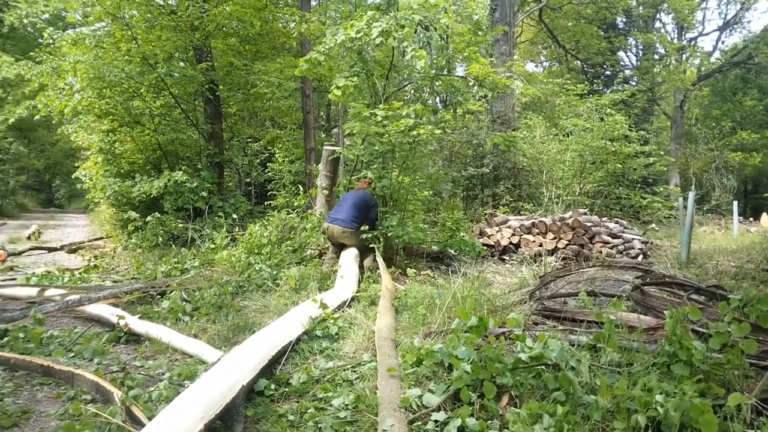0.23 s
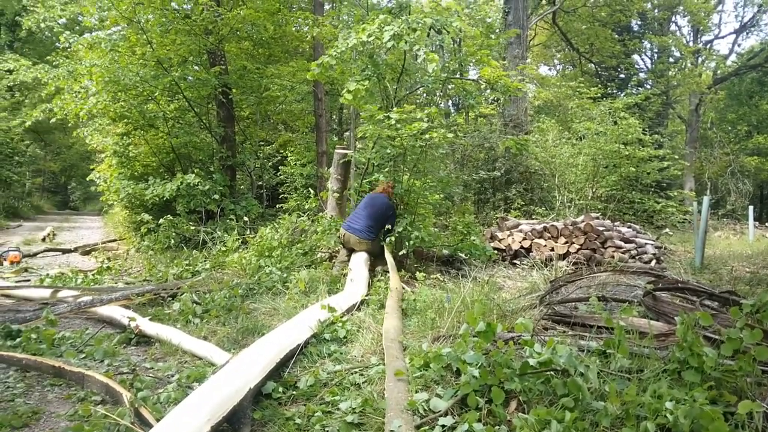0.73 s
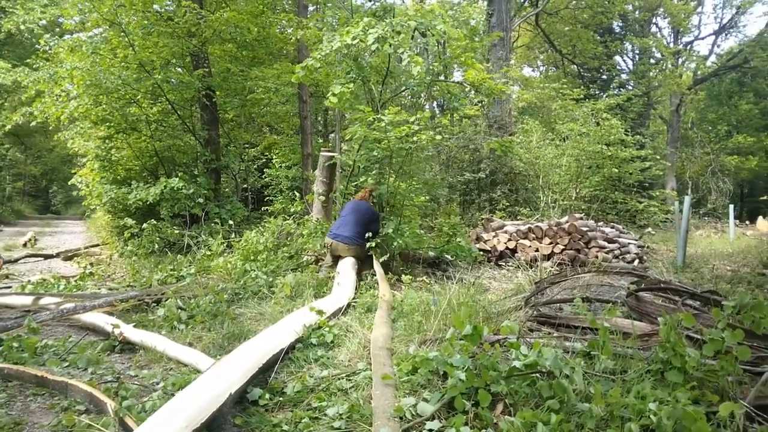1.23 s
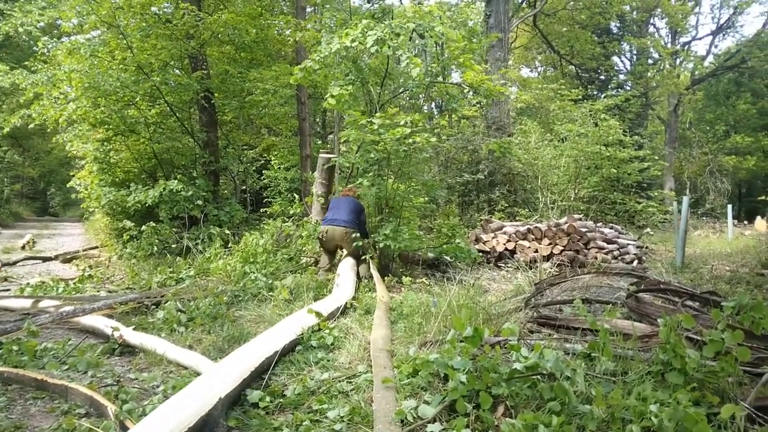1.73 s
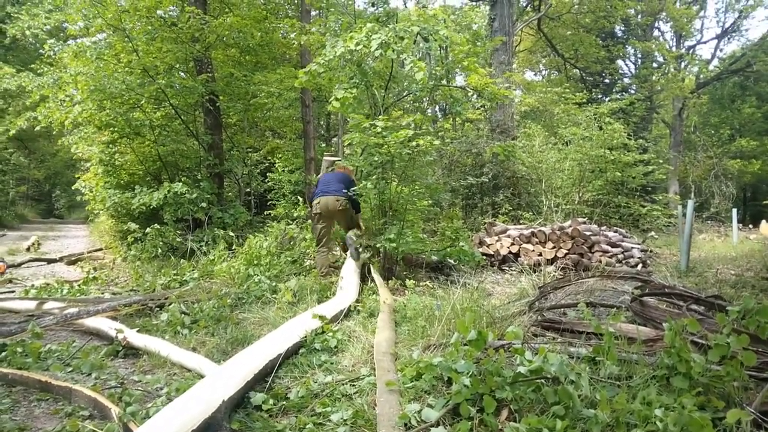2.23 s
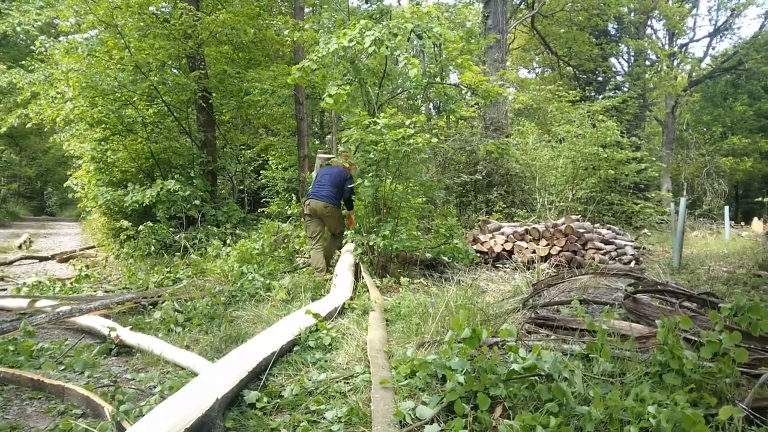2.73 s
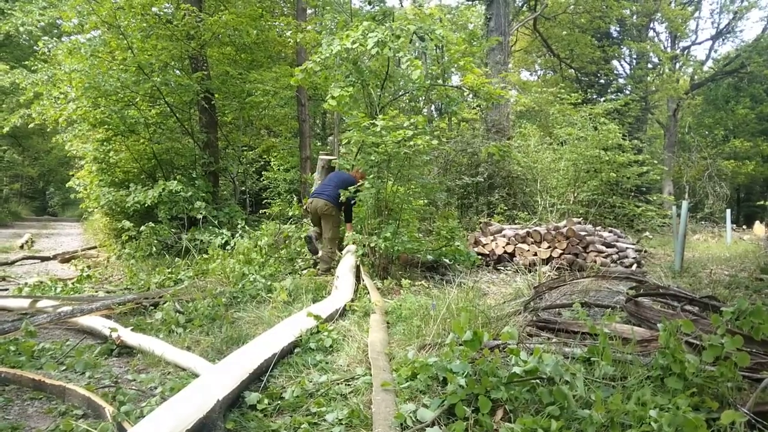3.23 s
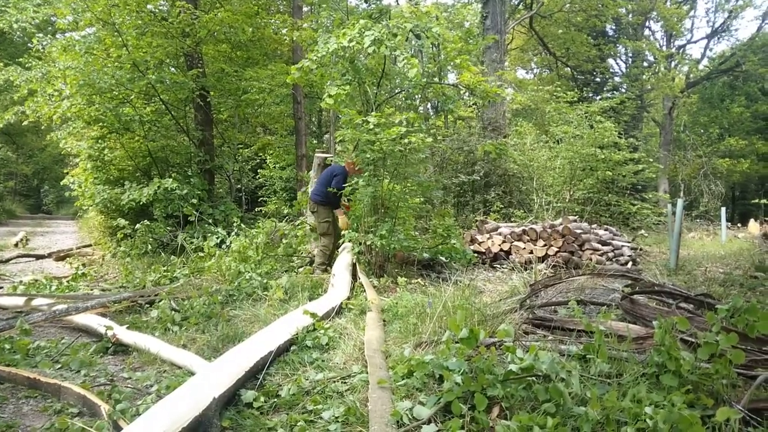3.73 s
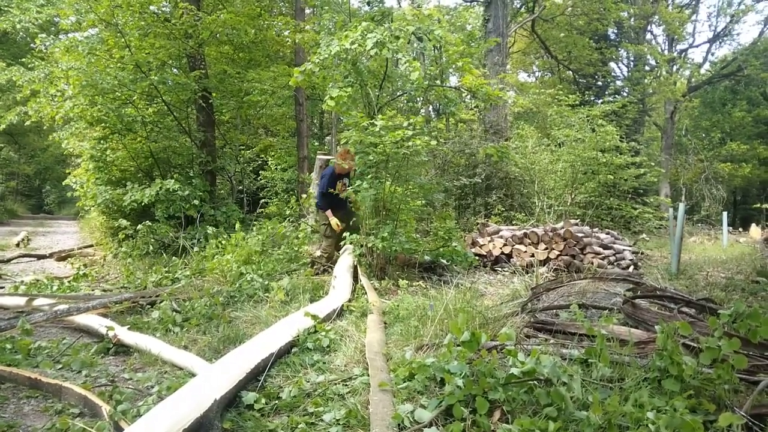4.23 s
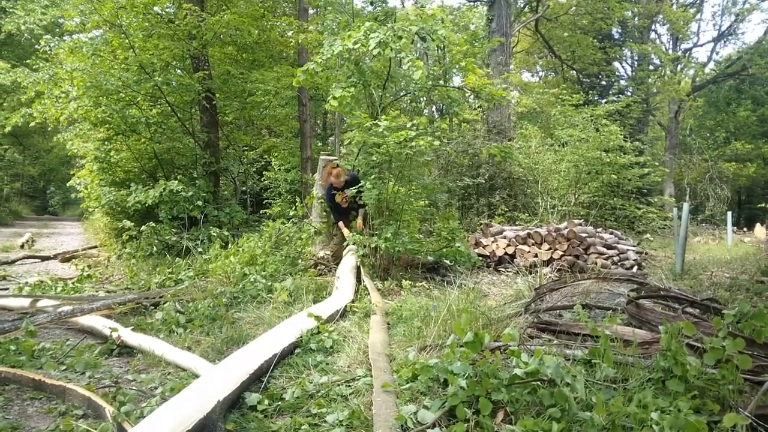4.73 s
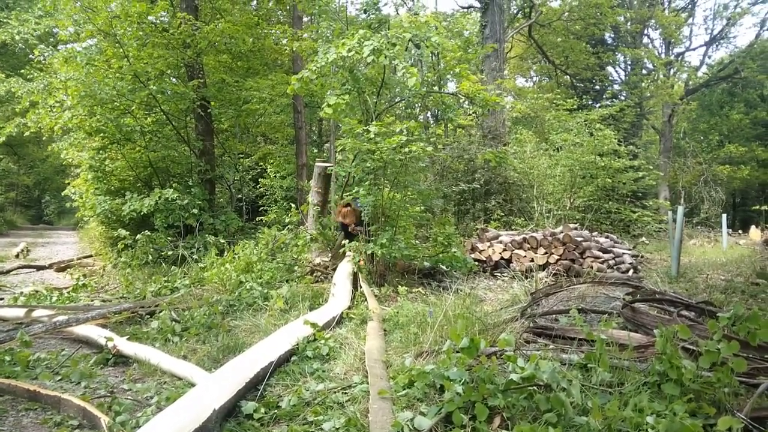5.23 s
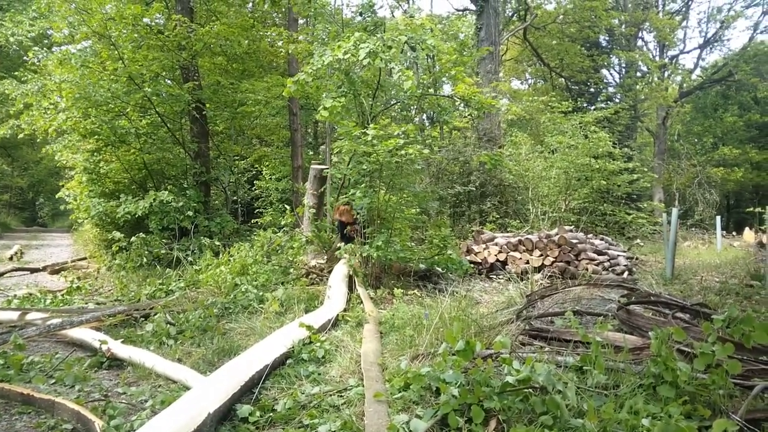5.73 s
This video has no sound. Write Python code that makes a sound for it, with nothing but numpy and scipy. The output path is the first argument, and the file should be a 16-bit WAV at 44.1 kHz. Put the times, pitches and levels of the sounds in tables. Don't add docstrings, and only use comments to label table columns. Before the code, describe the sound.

Bark is wrenched off a felled trunk in a quiet wood: fibres snap, one hard crack, dry peeling, litter rustle, faint birds, a final ripping strip.

```python
import sys
import numpy as np
from scipy import signal
from scipy.fft import rfft, irfft, next_fast_len
from scipy.io import wavfile
from scipy.ndimage import uniform_filter1d

SR = 44100
rng = np.random.default_rng(int(sys.argv[2]) if len(sys.argv) > 2 else 0)


def to_wav(sig):
    pcm = np.clip(np.atleast_2d(sig), -1, 1) * 32767
    pcm = np.round(pcm).astype(np.int16)
    wavfile.write(sys.argv[1], SR, pcm.T)


def how_loud(loudness_db):
    steps = np.asarray(loudness_db, float) / 20
    return 10 ** steps


N = 263277
TIME = np.arange(N) / SR
PADDED = next_fast_len(N + 4096, True)
HZ = np.arange(PADDED // 2 + 1) * SR / PADDED + 1e-3
OPPOSITE = np.array([[1], [-1]])

# [t/s, effort/dB, thickness of the bark that gives/dB]
PULLS = [
    [(0.505, -80, -5), (0.53, -69, -5), (0.542, -66, -12.5), (0.612, -41.5, 7), (0.65, -45, -2),
     (0.69, -54, -1), (0.75, -56, -0.5)],
    [(0.75, -58, -1), (0.82, -61, -5), (0.86, -60, -9.5), (1.034, -59, -14.5), (1.106, -64.5, -14),
     (1.186, -60, -15), (1.194, -47, -31), (1.204, -56, -15), (1.4, -55, -15.5)],
    [(1.4, -55, -16.5), (1.522, -44.5, -5.5), (1.538, -52.5, -7), (1.602, -46.5, -13.5), (1.7, -61.5, -5.5),
     (1.714, -63, -17.5), (1.854, -64, -1), (1.926, -65, -13.5), (1.935, -75, -10)],
    [(3.875, -71, -21), (3.93, -58, 6.5), (3.986, -59, -20.5), (4.146, -65, -10), (4.165, -75, -9)],
    [(4.772, -76, -19), (4.812, -61.5, -21), (4.95, -68.5, -17), (4.974, -68, -16), (4.985, -87.5, -10)],
    [(5.553, -80.5, 8), (5.558, -58, 3), (5.572, -69, -5), (5.594, -72, -12), (5.6, -82, -15),
     (5.62, -86, -15)],
    [(5.712, -93, 10), (5.739, -65, 4), (5.744, -41, -2.5), (5.758, -48, -1.5), (5.888, -36, -19),
     (5.908, -45, -5.5), (5.97, -46, -15)],
]


def level(x, db):
    return x * how_loud(db) / np.sqrt(np.mean(x ** 2))


def on_log(hz, table):
    f, v = np.transpose(table)
    return np.interp(np.log(hz + 1), np.log(f), v)


def shaped(x, gain):
    return irfft(rfft(x, PADDED) * gain, PADDED)[..., :N]


def bell(hz, width):
    return 1 / (1 + 1j * (HZ - hz ** 2 / HZ) / width) ** 2


def band(x, hz, width):
    return shaped(x, bell(hz, width))


def walk(rate):
    k = int(SR / rate)
    steps = np.repeat(rng.standard_normal(N // k + 1), k)
    return 1.3 * uniform_filter1d(uniform_filter1d(steps, k), k)[:N]


def patchy(x, table, centres_hz, walks_db):
    bands = np.clip(1 - np.abs(np.log2(HZ / centres_hz[:, None])), 0, 1)
    return how_loud(walks_db) * shaped(x, how_loud(on_log(HZ, table)) * bands)


def grains(rate, scatter_db):
    breaks = rng.random(N) < rate / SR
    size_db = scatter_db * np.minimum(rng.exponential(size=N), 3)
    return breaks * how_loud(size_db) * rng.standard_normal(N)


def rings(table, rise, spread, rough, splinter):
    out = np.zeros(N + 8192)
    chance = rng.random((len(table), 2))
    grit = rng.standard_normal((len(table), 2048))
    for (s, db, hz, cycles), (a, b), noise in zip(table, chance, grit):
        turn = np.arange(min(int(4 * max(cycles, .5) * SR / hz), 8000)) * hz / SR
        shape = (1 - np.exp(-turn / rise)) ** 2 * np.exp(-2 * turn / cycles)
        second_turn = turn * (1 + spread * (.5 + a)) + b
        ring = np.sin(2 * np.pi * turn) + rough * np.sin(2 * np.pi * second_turn)
        wide = 1 + int(SR / hz / 4)
        burst = uniform_filter1d(np.resize(noise, len(turn)), size=wide)
        ring += splinter * np.sqrt(wide) * uniform_filter1d(burst, size=wide)
        i = int(s * SR)
        out[i:i + len(turn)] += how_loud(db) * shape / shape.max() * ring
    return out[:N]


def handled(tables):
    effort_db, thick_db = np.full(N, -200.), np.zeros(N)
    for table in tables:
        s, db, thick = np.transpose(table)
        on = (TIME >= s[0]) & (TIME <= s[-1])
        effort_db[on] = np.interp(TIME[on], s, db)
        thick_db[on] = np.interp(TIME[on], s, thick)
    return effort_db, thick_db


def played(tables_db):
    return uniform_filter1d(how_loud(np.array(tables_db)), size=200, axis=-1)


def wood():
    # [f/Hz, level/dB per Hz]
    breeze = [(7.1, -27.5), (12, 6.5), (30, -13.5), (63, -15), (96, -20), (259, -29.5), (319, -30),
              (566, -35.5), (1360, -54.5), (2300, -62.5), (4000, -58.5), (11000, -67), (16000, -61)]
    centres_hz, swell = 14 * 2 ** np.arange(11), walk(1.5)
    walks_db = np.array([.5 * swell + (.9 + 1.18 * (hz > 1500)) * walk(5.8) for hz in centres_hz])
    mid, side = (patchy(rng.standard_normal(N), breeze, centres_hz, walks_db) for _ in range(2))
    unlike = on_log(centres_hz, [(20, .75), (60, .55), (200, .6), (1000, .75), (6000, .8)])[:, None]
    mid, side = (np.sum(p / np.sqrt(1 + unlike ** 2), axis=0) for p in (mid, unlike * side))
    return level(np.array([mid + side, mid - side]), -51)


def stirs():
    # [start t/s, peak t/s, end t/s]
    moments = [(0.078, 0.094, 0.104), (0.135, 0.152, 0.16), (0.338, 0.342, 0.346), (0.419, 0.422, 0.426),
               (0.445, 0.462, 0.478), (1.935, 1.98, 2.045), (2.05, 2.06, 2.11), (2.115, 2.17, 2.245),
               (2.25, 2.27, 2.312), (2.32, 2.42, 2.436), (2.438, 2.46, 2.541), (2.57, 2.62, 2.818),
               (2.832, 2.87, 2.927), (3.02, 3.04, 3.06), (3.295, 3.302, 3.314), (4.325, 4.335, 4.4),
               (4.61, 4.65, 4.668), (5.0, 5.045, 5.09), (5.11, 5.18, 5.228), (5.262, 5.268, 5.28),
               (5.29, 5.308, 5.322), (5.395, 5.42, 5.455), (5.655, 5.68, 5.7), (3.145, 3.152, 3.16),
               (3.715, 3.722, 3.735), (3.82, 3.845, 3.858)]
    # [peak level/dB, thickness/dB]
    strengths = [(-73, 4), (-81.5, 12.5), (-80, 1), (-80, -6), (-78.5, -4), (-67.5, -7), (-81, -9.5),
                 (-64, -6), (-76, -9), (-87, -8), (-67, -3.5), (-65.5, -12), (-64.5, -12), (-72.5, -29),
                 (-73, -4), (-81, -1.5), (-80, -8), (-67, -8.5), (-70, -8.5), (-86.5, 12), (-78.5, 1),
                 (-74, -5), (-87.5, 6.5), (-80.5, -14.5), (-89, -11), (-80, -1)]
    tail_s = 0.017
    return [[(start, db - 9, thick), (peak, db, thick), (end, db - 2.5, thick),
             (end + tail_s / 4, db - 13, thick), (end + tail_s, db - 21, thick)]
            for (start, peak, end), (db, thick) in zip(moments, strengths)]


def litter(gain):
    crunch = rng.standard_normal(N) + level(grains(250, 3.3), 0)
    dull = level(band(crunch, 450, 610), 0)
    loudest = how_loud(-59)
    return how_loud(-3.5 + 2.7 * walk(25)) * np.minimum(gain, loudest) * dull


def strip(gains, effort_db):
    # [f/Hz, width/Hz, level on the first strip/dB, level on the last/dB]
    resonances = [(3100, 600, -1, 3.5), (3600, 1100, 2, -2), (5600, 1400, -1.5, -3.5),
                  (7360, 3600, -9, -7.5), (2000, 700, -3.5, -23.5)]
    # [f/Hz, level/dB per Hz]
    leaf_hiss = [(880, -32), (1450, -4), (1860, 4.5), (2590, -1), (3690, 3), (4750, 0.5), (5340, 2),
                 (7450, -1), (8790, -5.5), (10100, -17.5), (13000, -25), (15500, -27.5)]
    last_strip_s = 5.0
    pull = np.clip((effort_db + 53) / 13, .08, .97)
    shared = level(grains(900, 4), 0)
    crackle = np.zeros(N)
    for hz, width, first_db, last_db in resonances:
        struck = level(grains(934, 4.1), 0) + 0.49 * shared + .5 * rng.standard_normal(N)
        crackle += how_loud(np.where(TIME < last_strip_s, first_db, last_db)) * band(struck, hz, width)
    rub = rng.standard_normal(N) + 0.44 * level(grains(1800, 1.5), 0) + 0.43 * level(grains(400, 2.2), 0)
    patches_db = [3 * walk(28) for _ in range(4)]
    hiss = patchy(rub, leaf_hiss, 1250 * 2 ** np.arange(4), patches_db).sum(axis=0)
    main = np.sqrt(pull) * level(crackle, 0) + np.sqrt(1 - pull) * level(hiss, 0)
    fibres = np.sqrt(pull) * shared + np.sqrt(1 - pull) * rng.standard_normal(N)
    woody = level(band(fibres, 1240, 1900), 0)
    wisp = 0.29 * np.abs(bell(14000, 4200))
    airy = level(shaped(rub, np.abs(bell(10000, 1600)) + wisp), 0)
    return sum(p * g * how_loud(1.6 * walk(40)) for p, g in zip((main, woody, airy), gains))


def rip():
    # [t/s, peak level/dB]
    low = [(5.7245, -58), (5.7422, -30), (5.746, -36), (5.75, -41), (5.7585, -33), (5.7625, -21.5),
           (5.77, -38), (5.773, -34), (5.78, -34), (5.786, -31), (5.8012, -37), (5.8057, -30),
           (5.8265, -29), (5.8295, -30), (5.8332, -36), (5.842, -33), (5.847, -19), (5.852, -46),
           (5.862, -26.5), (5.868, -31), (5.8728, -35), (5.877, -40), (5.8846, -33), (5.8956, -29.5),
           (5.9075, -36), (5.9258, -21.5), (5.9365, -45), (5.949, -42), (5.9595, -23.5), (5.963, -29.5)]
    # [t/s, peak level/dB]
    high = [(5.7253, -48.5), (5.731, -48), (5.746, -26.5), (5.75, -42), (5.752, -37), (5.758, -22.5),
            (5.7611, -17), (5.7619, -18.5), (5.764, -20.5), (5.7703, -25.5), (5.773, -26), (5.78, -31.5),
            (5.7852, -23), (5.7985, -33), (5.804, -24), (5.806, -30), (5.8118, -33), (5.8284, -24.5),
            (5.834, -30), (5.8431, -35), (5.848, -19), (5.8554, -29), (5.8595, -27), (5.8658, -30.5),
            (5.8674, -22), (5.875, -25), (5.878, -35), (5.8852, -27), (5.8951, -39), (5.907, -33),
            (5.9266, -27.5), (5.95, -45), (5.9596, -28), (5.963, -26.5)]
    cycles, scatter = 5, 0.085
    rows = [(s, db, 3100) for s, db in low] + [(s, db, 5600) for s, db in high]
    chance = rng.standard_normal(len(rows))
    return [(s, db, hz * (1 + scatter * c), cycles) for (s, db, hz), c in zip(rows, chance)]


def snapping():
    # [t/s, peak level/dB, ring f/Hz, decay/cycles]
    fibres = [(0.0819, -56, 2540, 1.5), (0.1511, -44, 6940, 1.6), (0.4575, -56.5, 3270, 4.2),
              (0.5337, -43, 3770, 9.9), (0.5721, -37, 3420, 7.1), (0.5843, -28, 4000, 2.5),
              (0.5996, -36.5, 3320, 4.8), (0.6037, -33.5, 3580, 4.4), (0.6057, -27.5, 3840, 4.6),
              (0.6098, -26, 3100, 6), (0.6125, -28.5, 3600, 4.5), (0.6172, -28.5, 3320, 4.8),
              (0.6205, -26, 3490, 5.8), (0.6231, -27.5, 3360, 3.6), (0.6273, -23.5, 3810, 4),
              (0.6333, -32.5, 3960, 4.8), (0.6414, -33, 3653, 4.3), (0.987, -52, 5300, 30),
              (1.0438, -43.5, 10000, 9), (1.4464, -37, 6550, 5.6), (1.563, -40, 3200, 4),
              (1.5178, -31, 9800, 4.3), (1.6755, -52, 1980, 3.7), (0.6447, -26, 4960, 4.3),
              (0.6563, -32.5, 4244, 4.2), (0.7145, -22, 3730, 2.8), (0.7147, -25, 5140, 3),
              (1.1941, -45, 2600, 2), (1.2114, -40, 3920, 1.7), (1.359, -48, 6030, 3.8),
              (1.461, -37, 4040, 17), (1.487, -38, 2970, 5.5), (1.4988, -61.5, 3600, 3.9),
              (1.5083, -39, 4070, 5), (1.5175, -33, 4100, 2.2), (1.525, -29, 3840, 3.3),
              (1.5715, -36.5, 3150, 4.2), (1.5938, -25, 3100, 2.8), (1.5941, -25, 5900, 4),
              (1.6615, -33, 4050, 6), (1.6625, -27.5, 7100, 2.6), (1.7325, -51, 6000, 6),
              (0.095, -49.5, 8100, 4.7), (3.302, -61, 3460, 1.65), (3.9245, -40.5, 3700, 6.9),
              (3.9582, -43, 5435, 5.5), (5.0479, -53.5, 5387, 4.6), (5.1494, -60, 2840, 6),
              (5.2667, -63.5, 3000, 4.9), (5.5565, -42, 3060, 5.3)]
    # [t/s, peak level/dB, ring f/Hz, decay/cycles]
    more_fibres = [(1.005, -54, 5200, 48), (1.1935, -37.5, 10300, 4.7), (1.4975, -36, 1990, 6),
                   (1.6635, -37.5, 3900, 6), (2.1635, -54.5, 2920, 6.8), (3.3025, -60.5, 2000, 3),
                   (4.8105, -57, 4320, 5), (4.335, -64, 3300, 3), (1.4445, -45, 2100, 5), (4.7893, -58, 6690, 5),
                   (4.8033, -58, 3570, 5), (5.1769, -58, 3100, 8), (1.3595, -46, 9300, 5), (1.4, -54, 3500, 3.7),
                   (1.335, -49, 2200, 4), (1.417, -48, 3000, 4), (4.005, -47, 7000, 4)]
    snaps = rings(fibres + more_fibres, rise=.45, spread=.25, rough=.35, splinter=.9)
    snaps = snaps + rings(rip(), rise=0.57, spread=0.85, rough=0.031, splinter=0.45)
    return shaped(snaps, 1 / (1 + (1900 / HZ) ** 6))


def cracking():
    # [t/s, peak level/dB, ring f/Hz, decay/cycles]
    bark = [(0.115, -62, 860, 6), (0.153, -44.5, 627, 0.98), (0.5958, -17, 1240, 1.4),
            (0.6062, -7.5, 1360, 1.55), (0.6097, -21, 950, 1.4), (0.5843, -48, 1410, 2),
            (0.6012, -28.5, 560, 0.94), (0.6119, -22.5, 1310, 1.2), (0.6125, -36, 570, 2.3),
            (0.6178, -23, 660, 1.6), (0.6208, -20.5, 1286, 1.5), (0.6253, -37, 1200, 2),
            (0.6322, -36, 819.7, 1.6), (0.6385, -43, 781.6, 2.006), (0.657, -36, 1974, 4),
            (0.6853, -44, 1248, 2), (0.7007, -37, 1420, 2), (1.5095, -48, 650, 1.4),
            (1.517, -61.5, 710, 2.4), (1.5945, -43, 1590, 2.4), (2.1395, -55.5, 1500, 3),
            (2.171, -59.5, 730, 2), (2.198, -60, 1542, 3), (5.7513, -38, 1280, 1.6),
            (5.8277, -38, 1480, 1.5), (5.847, -35, 1950, 3.3), (5.926, -24, 2000, 4.8),
            (5.9125, -33, 1900, 3), (0.714, -31.5, 1954, 4.8), (1.66, -46, 740, 2), (2.444, -61, 1362, 3.4),
            (2.462, -49, 1030, 2.1), (3.112, -58, 755, 1.87), (3.302, -61, 787, 4.4), (3.59, -59, 760, 3),
            (3.916, -44.5, 715, 1.84), (3.917, -45, 1820, 3), (3.929, -51, 1220, 2.3),
            (3.958, -47.5, 892, 1.64), (4.434, -68, 1390, 2.06), (4.567, -66, 1780, 1.6),
            (5.556, -49.5, 760, 4.2), (5.728, -47, 1012, 3.6), (5.743, -32.5, 950, 1.2),
            (5.814, -41, 940, 3.2), (5.9105, -20.5, 1310, 2.1), (5.9265, -27, 1250, 2.7),
            (5.9318, -26.5, 1350, 1.5)]
    return -rings(bark, rise=0.9, spread=0.25, rough=0.18, splinter=0.02)


def trunk():
    # [f/Hz, width/Hz, level/dB]
    modes = [(265.4, 28, 2.5), (190.3, 29, 1), (427, 600, -5.5)]
    mid, side = (rng.standard_normal(N) + level(grains(270, 0.99), 0) for _ in range(2))
    x = mid + .35 * side * OPPOSITE
    effort_db, thick_db = handled(PULLS)
    shake_db = -54 + 0.76 * (effort_db + 48) + 0.4 * (thick_db + 3.5)
    return played(shake_db) * level(sum(how_loud(db) * band(x, f, w) for f, w, db in modes), 0)


def thudding():
    # [t/s, peak level/dB, ring f/Hz, decay/cycles]
    knocks = [(0.607, -44, 200, 3), (0.619, -45, 420, 2), (0.626, -35.5, 242, 2.2), (0.639, -43, 340, 2),
              (0.647, -40.5, 300, 2.5), (1.52, -44.5, 414, 2.8), (2.165, -59, 349.7, 3.5),
              (2.462, -58, 517, 2), (2.78, -60, 600, 1.9), (2.863, -58, 600, 1.66), (4.33, -61, 699, 4.1),
              (1.444, -47.5, 240, 2.5), (1.664, -50.5, 244, 2.5), (1.86, -66.5, 180.6, 1.75),
              (2.503, -55, 139.2, 1.5), (2.552, -48, 232.6, 1.3), (2.586, -53.5, 206, 1.86),
              (2.812, -56, 293.6, 0.99), (2.853, -55.5, 137, 1.6), (3.013, -61, 166.6, 1.3),
              (3.59, -53.5, 322, 1.6), (3.916, -42.5, 430.6, 4.1), (4.042, -56, 126.7, 1.3),
              (4.119, -52, 389, 1.6), (4.121, -53.5, 140, 1.7), (3.595, -51.5, 91.6, 2.04),
              (3.94, -54, 151, 2), (4.328, -57, 179, 1.36), (4.852, -60.5, 132, 1.3),
              (5.547, -56.5, 130.2, 1.88), (5.748, -44, 261.4, 16), (5.912, -40.5, 580, 1.5)]
    return rings(knocks, rise=0.75, spread=0.47, rough=0.62, splinter=0.46)


def trees(x):
    t60_s = 0.087
    t = TIME[:SR // 2]
    tail = rng.standard_normal((2, len(t))) * how_loud(-60 * t / t60_s) * (1 - np.exp(-t / 0.002)) ** 2
    tail /= np.sqrt(np.sum(tail ** 2, axis=1, keepdims=True))
    return how_loud(-5.5) * signal.fftconvolve(x[None], tail, axes=1)[:, :N]


def birds():
    # [start t/s, end t/s, pitch f/Hz, wobble/Hz,
    # level/dB]
    whistles = [(1.78, 1.865, 4440, 60, -75), (1.974, 2.04, 4400, 16.4, -64), (1.968, 2.08, 3930, 69, -65),
                (2.167, 2.249, 4400, 40, -72), (2.375, 2.495, 4380, 31, -75.5),
                (2.419, 2.546, 3960, 15, -66), (2.6, 2.73, 3960, 42, -67.5), (2.575, 2.66, 3730, 60, -66),
                (2.76, 2.837, 3260, 30, -72.5), (2.845, 2.941, 3945, 25, -62),
                (2.953, 3.083, 3945, 26, -76), (3.462, 3.718, 3780, 20, -72),
                (3.637, 3.81, 4023, 15.6, -73.5), (3.758, 3.88, 3790, 63, -78.5),
                (4.59, 4.668, 4340, 73, -58.5), (4.795, 5.0, 1880, 40, -73), (5.166, 5.21, 3150, 260, -72),
                (2.658, 2.82, 3570, 40, -70.5), (4.335, 4.417, 3485, 60, -81),
                (4.667, 4.798, 4310, 69, -74), (4.869, 4.977, 5750, 140, -68),
                (5.024, 5.106, 5230, 300, -66), (5.106, 5.159, 4700, 120, -65),
                (5.33, 5.501, 7360, 61, -72.5), (5.52, 5.597, 7400, 58, -68), (5.602, 5.622, 7450, 40, -63),
                (5.635, 5.7, 7400, 58, -72), (1.699, 2.935, 7360, 96, -78.5)]
    out, waver, flutter = np.zeros(N), walk(600), how_loud(4 * walk(55))
    for start, end, hz, wobble_hz, db in whistles:
        on = (TIME > start) & (TIME < end)
        swell = np.sin(np.pi * (TIME[on] - start) / (end - start)) ** 0.5
        turn = np.cumsum(hz + wobble_hz * waver[on]) / SR
        out[on] += how_loud(db) * swell * flutter[on] * np.sin(2 * np.pi * turn)
    return out


def placed(mid, side):
    # [t/s, left minus right level/dB]
    hands = [(0.0, -8), (0.37, 5.5), (0.62, 1.5), (1.1, -4.5), (1.78, 1), (1.99, 3.5), (2.51, 1.5),
             (3.03, 1.5), (3.31, -1), (3.59, 2), (3.81, 0), (5.04, 0), (5.39, 2), (5.97, 0.5)]
    pan_db = np.interp(TIME, *np.transpose(hands))
    return (mid + side * OPPOSITE) * how_loud(np.array([pan_db, -pan_db]) / 2)


def grounded(x):
    from_s, lag_s = 5.5, .00046
    share = 0.3 * (TIME > from_s)
    return (x - share * np.roll(x, int(lag_s * SR), axis=-1)) / np.sqrt(1 + share ** 2)


def ports(x):
    # [f/Hz, left minus right level/dB]
    tilt = [(1200, 0), (2100, -5), (3400, 6), (4700, 0), (6000, 1), (7600, 9), (8700, 0), (10200, -13)]
    # [f/Hz, phase lag/rad]
    lag = [(300, .15), (1100, .2), (2100, 1.3), (3200, .7), (4300, 1.5), (5600, .6), (8000, .1)]
    left = how_loud(on_log(HZ, tilt) / 2) * np.exp(-.5j * on_log(HZ, lag))
    return shaped(x, np.array([left, 1 / left]))


def scene():
    # [f/Hz, side over mid/0-1]
    unlike = [(500, .25), (1200, .25), (2500, .45), (8000, .6)]
    db, thick_db = handled(PULLS + stirs())
    airy_db = -17.5 - 0.24 * thick_db - .17 * (db + 64.5)
    gains = played([db, db + thick_db, db + airy_db])
    effort_db = 20 * np.log10(gains[0] + 1e-9)
    mid, side = strip(gains, effort_db), strip(gains, effort_db)

    snaps, cracks = snapping(), cracking()
    blow_top_hz = 10300
    blows = shaped(snaps + cracks, 1 / (1 + (HZ / blow_top_hz) ** 8))
    bounce = rng.standard_normal((2, 512)) * np.exp(-TIME[:512] / 0.0034) / 8
    crack_bounce = 0.51
    side_bounce = np.convolve(blows - (1 - crack_bounce) * cracks, bounce[0])[:N]
    side = shaped(side + side_bounce, on_log(HZ, unlike))
    mid_bounce = np.convolve(snaps, bounce[1])[:N]
    mid = mid + .55 * shaped(mid_bounce, 1 / (1 + (HZ / blow_top_hz) ** 6))
    near = placed(mid + blows, side)

    gate = how_loud(-14 * np.clip((-74.0 - effort_db) / 14, 0, 1))
    around = None
    airborne = grounded(near + gate * trees(blows)) + gate * birds() + wood()
    return ports(airborne) + trunk() + litter(gains[1]) + thudding()


def roll_off(x):
    return signal.sosfilt(signal.butter(12, 15770, fs=SR, output="sos"), x)


def record(dry):
    mic_hz, top_hz = 17000, 16000
    heard = shaped(dry, 1 / (1 + (HZ / mic_hz) ** 4) / (1 + (HZ / top_hz) ** 60))
    return roll_off(heard)


dry = scene()
out = record(dry)
to_wav(out)
```